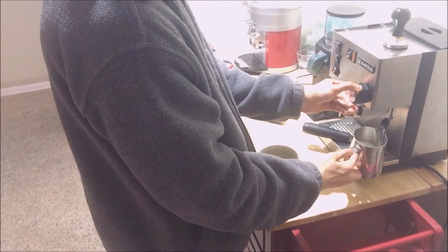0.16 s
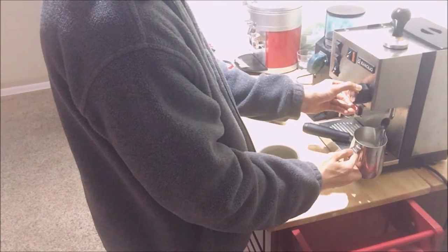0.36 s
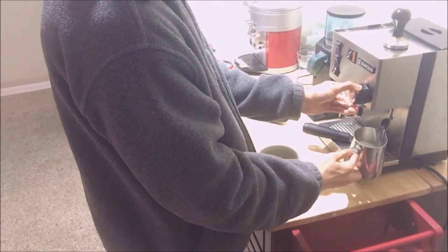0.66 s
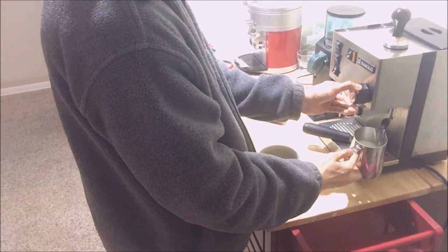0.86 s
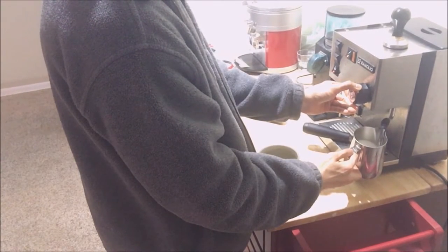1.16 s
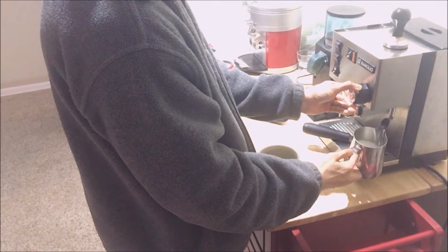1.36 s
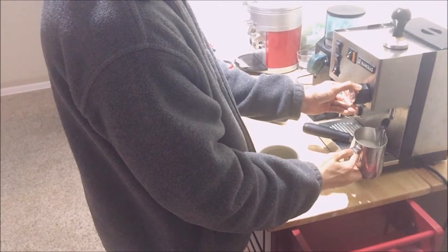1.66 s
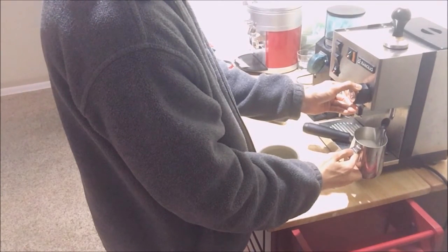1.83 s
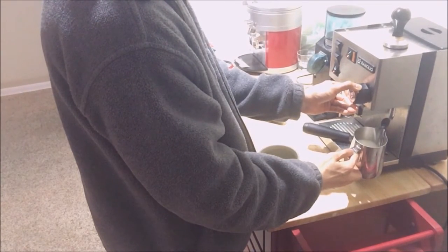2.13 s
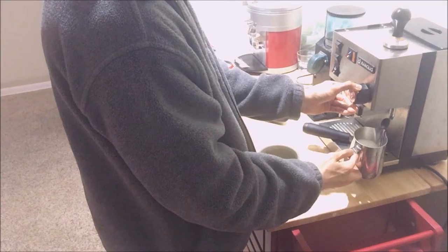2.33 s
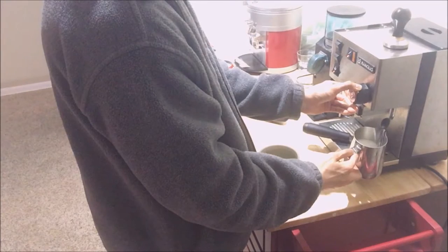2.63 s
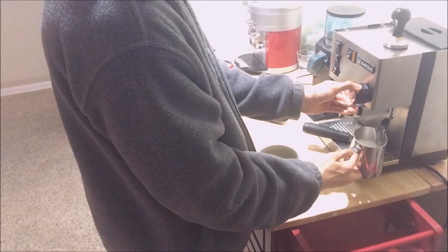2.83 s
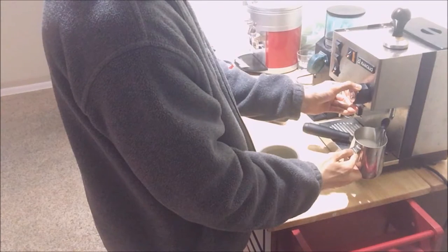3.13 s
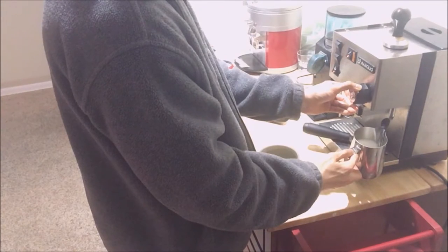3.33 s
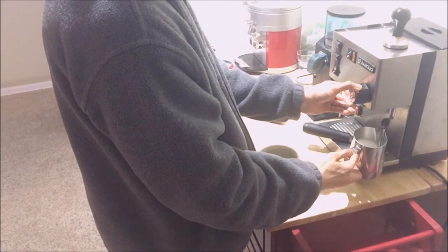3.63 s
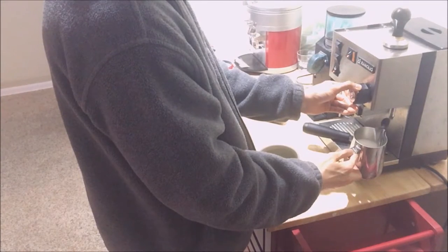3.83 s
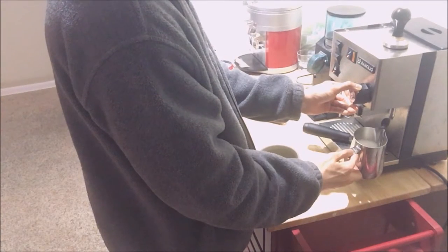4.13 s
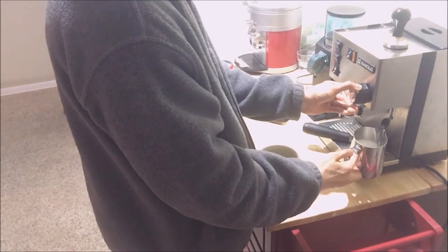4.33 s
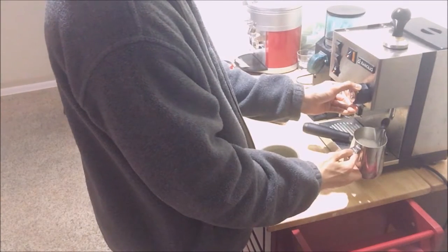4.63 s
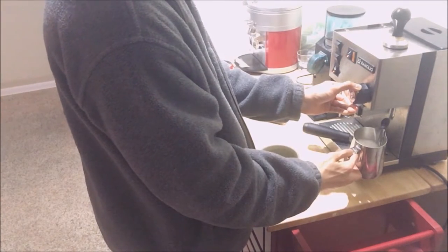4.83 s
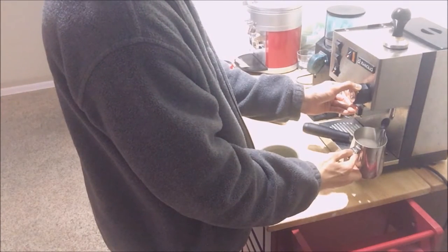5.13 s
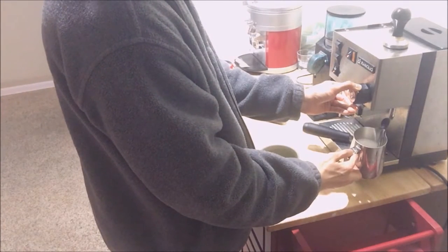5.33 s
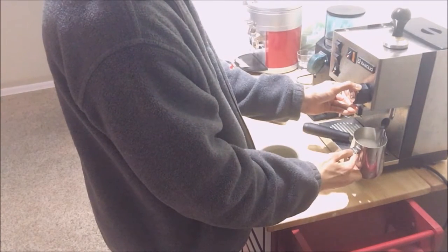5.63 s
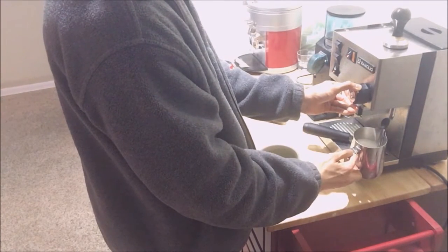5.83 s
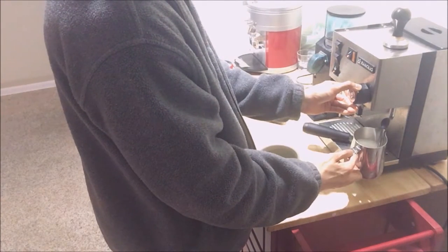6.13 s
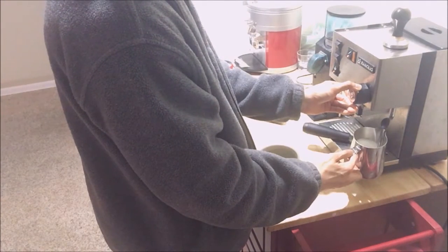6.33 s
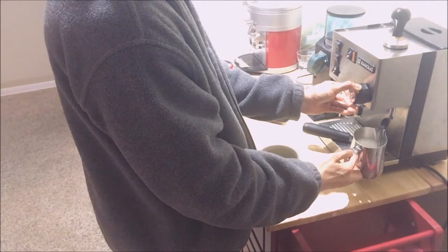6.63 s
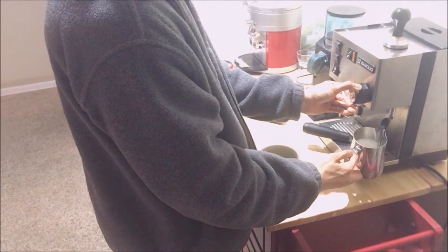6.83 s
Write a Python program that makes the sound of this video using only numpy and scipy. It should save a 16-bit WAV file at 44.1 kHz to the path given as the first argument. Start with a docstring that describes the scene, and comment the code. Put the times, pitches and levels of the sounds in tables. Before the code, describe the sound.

A steam wand is already running in a steel pitcher of milk, close up in a small kitchen with short reflections and faint low rumble. From 0 s, dense bubble crackle rings the metal, with fluttering hiss and a fuzzy, trembling screech around 2.8 kHz. Short chirps sound on notes near 1 and 2.8 kHz. The boil surges around 1 s. At 1.4-1.55 s the tip gulps air in three quick tearing, gurgling spurts, stirring a soft low note that settles. Crackle flares in uneven bursts from 2 to 3.5 s, with a small gulp at 3.2 s. By 3.4 s foam has shifted the resonances and damped the treble. From 4.8 s the boil recedes and gulps come often: spitting spray, shrill or deep gurgles, and brief squeals near 4.9, 5.4 and 6.65 s. They crowd closely from 6.5 to 6.9 s, the steam still running at the end.

```python
"""A steam wand heats milk in a steel pitcher in a small kitchen, over a low room rumble.
From the start bubbles collapse in a dense crackle that rings the pitcher, over the jet's hiss and a screech.
Larger bubbles chirp on single notes; at 1.4 s the tip first gulps air, with a tearing spray and a gurgle.
Foam builds up by about 3.4 s and shifts the resonances; from 4.8 s gulps come often, a few with squeals."""
import sys
import numpy as np
from scipy import signal
from scipy.fft import rfft, irfft
from scipy.io import wavfile
from scipy.ndimage import map_coordinates

SR = 44100
rng = np.random.default_rng(int(sys.argv[2]) if len(sys.argv) > 2 else 0)


def int16_out(signal):
    """Quantize to a 16-bit WAV file."""
    q = np.round(np.clip(np.atleast_2d(signal).T, -1, 1) * 32767)
    wavfile.write(sys.argv[1], SR, q.astype(np.int16))


N = 307377
TIME = np.arange(N) / SR
FOAMED_S = 3.36  # foam has built up by then
CHIRP_S = 0.0115  # bubble ring, about the span between its edge_db points

# the tip draws air: t/s, length/s, spray level before trim/dB, gurgle level before trim/dB, shrillness 0-1
GULPS = [(1.361, 0.022, -41, -46, 0.2), (1.472, 0.027, -39, -42, 0), (1.541, .009, -42.5, -56, .3),
         (3.195, 0.023, -51, -42, 0.57), (4.841, 0.053, -41, -37, .4), (4.899, 0.041, -45.5, -39, .7),
         (5.275, 0.023, -40, -36.5, 0), (5.296, 0.075, -47.5, -37.5, 0.87), (5.392, 0.043, -38.5, -42, 0.9),
         (5.692, .028, -37.5, -55, 0), (5.804, 0.049, -44, -39.5, 0.93), (6.216, .033, -50, -40.5, 0.96),
         (6.276, .034, -37.5, -45, 0.03), (6.347, 0.013, -43.5, -37, 1), (6.517, 0.016, -41, -44.5, .2),
         (6.628, 0.033, -37, -39.5, 0), (6.667, 0.04, -37.5, -42.5, 0.27), (6.72, 0.045, -35, -44, .3),
         (6.761, 0.038, -57, -40, 0.98), (6.871, 0.0092, -37.5, -40.5, 0.1)]
# smooth colour of the boil ahead of the resonances: f/Hz, relative density/dB per Hz
BOIL_COLOUR = [(100, -21), (450, -17), (750, -12), (1000, -3), (1700, -4.5), (2400, 0.5), (3300, -3.5),
               (4700, -3.5), (6000, -14), (7500, -23.5), (10000, -36.5), (16000, -35)]


def gain_of(db):
    """Decibels to amplitude."""
    return 10 ** (np.asarray(db) / 20)


def evened(x):
    """Scales to rms 1."""
    return x / np.sqrt(np.mean(x ** 2) + 1e-20)


def read(points, hz):
    """Interpolates a curve along log frequency."""
    f, value = np.transpose(points)
    return np.interp(np.log(hz + 1), np.log(f + 1), value)


def drift(rate_hz, size=16384):
    """Smooth noise of rms 1 with a Gaussian roll-off at rate_hz."""
    hz = np.fft.rfftfreq(size, N / SR / size)
    spectrum = rfft(rng.standard_normal(size)) * np.exp(-(hz / rate_hz) ** 2)
    return evened(np.interp(TIME, np.linspace(0, N / SR, size), irfft(spectrum)))


def band_rms(x, band_hz):
    """Rms of x inside a band."""
    bandpass = signal.butter(4, band_hz, "band", fs=SR, output="sos")
    return np.std(signal.sosfilt(bandpass, x))


def fuzzy_tone(hz, spread_hz):
    """A resonance driven by turbulence: quadrature carriers under slow noise, rms 1."""
    in_phase = drift(spread_hz) * np.cos(2 * np.pi * hz * TIME)
    quadrature = drift(spread_hz) * np.sin(2 * np.pi * hz * TIME)
    return in_phase + quadrature


def rumble(level_db=-66):
    """The low, steady background of the room: shaped noise."""
    # f/Hz, relative level/dB
    rumble_colour = [(15, -9), (48, -1.5), (65, -2.5), (87, -1), (125, -7.5), (190, -10), (270, -11),
                     (400, -19), (3000, -38)]
    hz = np.fft.rfftfreq(N, 1 / SR)
    spectrum = rfft(rng.standard_normal(N)) * gain_of(read(rumble_colour, hz))
    return gain_of(level_db) * evened(irfft(spectrum, N))


def kitchen(x, size=16384):
    """Dense reflections from the counter and walls: decaying noise taps, the top dying first."""
    # decay: f/Hz, t60/s
    decay = [(200, 0.18), (1000, 0.24), (4000, 0.25), (15000, 0.1)]
    taps = rng.standard_normal(size) * (TIME[:size] > 0.004)
    hz, t, z = signal.stft(taps, SR, nperseg=256)
    z_decayed = z * gain_of(-60 * t / read(decay, hz)[:, None])
    tail = signal.istft(z_decayed, SR, nperseg=256)[1]
    return signal.oaconvolve(x, tail / np.linalg.norm(tail))[:N]


def response(colour, ring, modes, tilt_db_per_oct, size=4096):
    """Minimum-phase taps of unit energy: smooth colour, tilt, and resonance lifts scaled by ring."""
    hz = abs(np.fft.fftfreq(size, 1 / SR))
    lift = 1.0  # power
    for f, width, db in modes:
        lift = lift + (gain_of(db) ** 2 - 1) / (1 + ((hz - f) / (width / 2)) ** 2) ** 1.5
    octaves = np.log2(np.clip(hz, 900, 4500))  # tilt acts between these only
    smooth = np.log(gain_of(read(colour, hz) + tilt_db_per_oct * octaves))
    log_gain = smooth + ring * np.log(lift) / 2
    taps = np.fft.ifft(np.exp(np.conj(signal.hilbert(log_gain)))).real[:size // 2]
    return taps / np.linalg.norm(taps)


def pitcher(x, colour, ring, fresh_tilt_db_per_oct=1.6, swirl=0.093):
    """Rings x through the pitcher; growing, swirling foam shifts the resonances and damps the treble."""
    # modes of pitcher and contents: f fresh/Hz, f foamed/Hz, width/Hz, lift at ring 1/dB
    modes = [(717, 636, 65, 9.5), (945, 959, 73, 16), (1062, 1020, 56, 15.5), (1200, 1380, 91, 7.5),
             (1574, 1556, 88, 9), (2133, 1919, 77, 8), (2580, 2666, 121, 11), (2860, 2825, 97, 13.5),
             (3935, 4100, 168, 10), (4100, 4315, 260, 7.5), (5260, 5220, 153, 9.5), (5590, 5580, 244, 8.5),
             (6620, 6700, 210, 8), (9800, 9550, 215, 8.5)]
    fresh_modes = [(hz, width, db) for hz, _, width, db in modes]
    foamed_modes = [(hz, width, db) for _, hz, width, db in modes]
    fresh = response(colour, ring, fresh_modes, fresh_tilt_db_per_oct)
    foamed = response(colour, ring, foamed_modes, 0)
    foam = np.clip(TIME / FOAMED_S + swirl * drift(13), 0, 1)
    return (1 - foam) * signal.oaconvolve(x, fresh)[:N] + foam * signal.oaconvolve(x, foamed)[:N]


def steel_walls(x, t60_s, share, size=2048):
    """Treble bounces between the pitcher's walls; share is their part of the power."""
    t = TIME[:size]
    bounces = rng.standard_normal(size) * gain_of(-60 * t / t60_s) * (t > 0.0005)
    bounces = signal.sosfilt(signal.butter(2, 4500, "high", fs=SR, output="sos"), bounces)
    bounces /= np.linalg.norm(bounces)
    share = np.clip(share, 0, 1)
    return np.sqrt(1 - share) * x + np.sqrt(share) * signal.oaconvolve(x, bounces)[:N]


def crackle(clicks_per_s, spread_db, share):
    """Bubble clicks of uneven size in a wash of countless tiny ones; share is the clicks' power."""
    sizes = gain_of(spread_db * np.minimum(rng.exponential(1, N), 4)) * rng.choice([-1, 1], N)
    clicks = evened(sizes * (rng.random(N) < clicks_per_s / SR))
    share = np.clip(share, 0, 1)
    return np.sqrt(share) * clicks + np.sqrt(1 - share) * rng.standard_normal(N)


def patchy(x, depth_db, patch_hz, patch_s):
    """Each part of the spectrum swells by itself, as when bubbles of like size come in swarms."""
    hz, t, z = signal.stft(x, SR, nperseg=256)
    place = np.meshgrid(hz / patch_hz, t / patch_s, indexing="ij")
    swarms = evened(map_coordinates(rng.standard_normal(z.shape), place, order=1, mode="wrap"))
    return evened(signal.istft(z * gain_of(depth_db * swarms), SR, nperseg=256)[1][:N])


def steam_db():
    """Boil, hiss and screech levels per sample, as the tip sits deeper or shallower."""
    # before trim: t/s, boil/dB, hiss/dB, screech/dB
    course = [(0.0, -54, -52.5, -46), (0.62, -57, -55.5, -54), (1.36, -55.5, -51, -45.5),
              (1.51, -53, -53.5, -47.5), (1.82, -55, -55.5, -50.5), (2.1, -53.5, -59, -46.5),
              (2.29, -56.5, -57, -49), (2.7, -58.5, -56.5, -55.5), (3.26, -55.5, -55, -51.5),
              (3.65, -58, -57, -52), (3.98, -54.5, -53.5, -48), (4.23, -61, -57, -54.5),
              (4.87, -58, -53, -49.5), (5.1, -63, -55, -56.5), (5.41, -64, -56.5, -49),
              (5.67, -60.5, -55, -60), (6.04, -64.5, -56, -58), (6.97, -60, -58, -54)]
    s, *levels_db = np.transpose(course)
    return [np.interp(TIME, s, db) for db in levels_db]


def flare_db():
    """Bell-shaped lifts of boil and hiss, as the steam pocket flares up or briefly chokes."""
    # t middle/s, length/s, boil lift/dB, hiss lift/dB
    surges = [(0.768, 0.051, -7, -0.5), (0.948, 0.15, 7.5, -0.5), (1.075, 0.092, 4.5, 6),
              (1.598, 0.067, 5, -2.5), (2.122, .11, 8.5, 2.5), (2.35, 0.016, 7.5, 1), (2.516, 0.13, 8, 5.5),
              (2.745, .05, -5.5, 1.5), (2.934, 0.051, 6.5, -2), (3.089, 0.016, 12, -1),
              (3.292, 0.17, 6.5, 0.5), (3.44, 0.013, 6, 0), (3.492, 0.024, 9, -1), (4.03, .07, 2.5, 4),
              (4.296, 0.064, -8, -3.5), (4.485, 0.091, 5, 5), (6.46, 0.052, -0.5, -4)]
    s, length_s, *lifts_db = np.transpose(surges)
    bells = np.exp(-(2 * (TIME - s[:, None]) / length_s[:, None]) ** 2)
    return np.array(lifts_db) @ bells


def heave(rest_db=-78, stirred_db=-66.0, start_s=1.36, settle_s=0.57):
    """The milk's soft low note; the first gulp stirs it up and it settles again."""
    age = TIME - start_s
    stirred = gain_of(stirred_db) * (age > 0) * np.exp(-abs(age) / settle_s)
    return (gain_of(rest_db) + stirred) * fuzzy_tone(hz=277.4, spread_hz=51)


def jet(trim_db=-0.78, flutter_db=1.3):
    """The fluttering hiss of the nozzle: patchy noise off the steel walls, rung by the pitcher."""
    # f/Hz, relative density/dB per Hz
    hiss_colour = [(300, -20), (780, -15.5), (1000, -6), (2000, -8.5), (3500, -7), (5500, 2.5), (7000, -1),
                   (8200, -7.5), (10300, -12.5), (11800, -12.5), (16000, -22)]
    drive = patchy(rng.standard_normal(N), depth_db=2.5, patch_hz=2010, patch_s=0.035)
    sound = pitcher(steel_walls(drive, t60_s=0.03, share=0.29), hiss_colour, ring=1.0)
    _, hiss_db, _ = steam_db()
    _, lift_db = flare_db()
    level_db = hiss_db + lift_db + trim_db + flutter_db * drift(21.3)
    return gain_of(level_db) * sound / band_rms(sound, (5000, 7500))


def screech(churn, trim_db=-4, churn_db=3):
    """The steam pocket at the tip drives a cluster of close modes into a fuzzy whistle."""
    # f/Hz, spread/Hz, relative level/dB
    cluster = [(2620, 46, -6), (2835, 44, 6), (2806, 60, -1)]
    whistle = sum(gain_of(db) * fuzzy_tone(hz, spread) for hz, spread, db in cluster)
    _, _, screech_db = steam_db()
    return gain_of(screech_db + trim_db + churn_db * churn) * evened(whistle)


def lesser_bubbles(spread_db=2.0, detune_hz=28):
    """Rows (t/s, dB, Hz, length/s) of chance bubbles on two notes; levels follow the boil's slow course."""
    # f/Hz, rate/(1/s), level before trim over the boil course at start/dB, once foamed/dB, at end/dB
    notes = [(1014, 11.9, -1, 9.6, 3), (2810, 8, 13, 9.6, 7)]
    boil_db, _, _ = steam_db()
    rows = []
    for hz, per_s, *over_db in notes:
        chance = rng.random(N)
        size, pitch = rng.standard_normal((2, N))
        db = boil_db + np.interp(TIME, [0, FOAMED_S, N / SR], over_db) + spread_db * size
        for i in np.flatnonzero(chance < per_s / SR):
            rows.append((TIME[i], db[i], hz + detune_hz * pitch[i], CHIRP_S))
    return rows


def ring_bubbles(rows, trim_db=-2, sag_hz=22, waver_hz=45, rough=0.14, edge_db=3.5, lean=0.067,
                 snap_db=-5, snap_s=0.0029):
    """A bubble tears off with a snap and rings as a short rough tone that sags in pitch."""
    waver, grit = drift(133), drift(170)
    noise, phases = rng.standard_normal(N), rng.random(N)
    tones, snaps = np.zeros((2, N))
    for (s, db, hz, length_s), phase in zip(rows, phases):
        near = slice(*np.searchsorted(TIME, [s - 2 * length_s, s + 2 * length_s]))
        age = 2 * (TIME[near] - s) / length_s  # in half lengths from the peak
        turns = np.cumsum(hz - sag_hz * age + waver_hz * waver[near]) / SR + phase
        # dies more slowly than it rose
        swell = gain_of(db + trim_db - edge_db * (age - lean * abs(age)) ** 2)
        tones[near] += swell * (1 + rough * grit[near]) * np.sqrt(2) * np.sin(2 * np.pi * turns)
        torn_s = TIME[near] - (s - length_s / 2)
        snaps[near] += gain_of(db + snap_db) * (torn_s > 0) * np.exp(-abs(torn_s) / snap_s)
    return tones + pitcher(snaps * noise, BOIL_COLOUR, ring=1)


def chirps():
    """Bubbles ring on one note each; air squealing through the tip rings all modes of its pocket."""
    # largest bubbles: t peak/s, level before trim/dB, f/Hz
    largest = [(0.408, -36.5, 2860), (0.973, -36, 2810), (0.982, -38, 1019), (1.073, -36, 2800),
               (1.41, -35.5, 2800), (1.586, -34.5, 1054), (1.922, -37.5, 1037), (1.969, -32.5, 2820),
               (2.042, -35.5, 1006), (2.342, -36, 1023), (2.42, -40, 1025), (2.661, -38, 1029),
               (3.038, -40, 979), (3.1, -37.5, 984.5), (3.493, -38, 2810), (3.647, -38, 1007),
               (4.852, -33, 2790), (4.928, -32, 2650), (5.297, -35.5, 1000), (5.39, -33, 2780),
               (5.704, -30, 1008), (5.722, -37, 951), (5.829, -35.5, 2700), (6.232, -36.5, 2650),
               (6.29, -39.5, 1000), (6.73, -37.5, 978), (6.791, -35.5, 2735)]
    # squeals: t peak/s, length/s, level before trim/dB, pitch factor
    squeals = [(4.864, .024, -33.5, 1.005), (5.391, 0.017, -35, .99), (5.419, .015, -31.5, 1.01),
               (6.645, .017, -37.5, 0.9)]
    # air pocket modes: f before pitch factor/Hz, relative level/dB
    pocket = [(1030, -0.5), (1480, -1.5), (1920, -2.5)]
    rows = [(s, db, hz, CHIRP_S) for s, db, hz in largest]
    for s, length_s, db, factor in squeals:
        for hz, mode_db in pocket:
            rows.append((s, db + mode_db, hz * factor, length_s))
    return ring_bubbles(rows + lesser_bubbles())


def gulp_envelope(gains, rise_s, fall_s, foam_db, foam_s):
    """Each gulp opens fast, holds and closes; foam fizzes as the tip nears the surface and sinks again."""
    power = np.zeros(N)
    for (s, length_s, *_), gain in zip(GULPS, gains):
        near = abs(TIME - s) < 0.4
        age = TIME[near] - s
        before, after = np.maximum(-age, 0), np.maximum(age - length_s, 0)
        opening = np.clip(age / (rise_s * (length_s / 0.036)), 0, 1)  # rise_s holds for a 36 ms gulp
        foamed = min(s / FOAMED_S, 1)  # more foam, more fizz
        foam = gain_of(foam_db) * foamed * np.exp(-(2 * before + after) / foam_s)
        power[near] += gain ** 2 * ((opening * np.exp(-after / fall_s)) ** 2 + foam ** 2)
    return np.sqrt(power)


def spray(gains, trim_db=1.0, sputter_db=2.0):
    """The bare jet tears the surface into droplets: sputtering crackle off the steel walls."""
    # f/Hz, relative density/dB per Hz
    spray_colour = [(200, -7.5), (450, -15), (900, -8.5), (3000, -18.5), (5500, -5), (7000, -5),
                    (9000, -6.5), (10800, 1), (13000, 1.5), (16000, -0.5)]
    droplets = crackle(clicks_per_s=2500, spread_db=5, share=0.56)
    drive = evened(droplets * gain_of(sputter_db * drift(130)))
    envelope = gulp_envelope(gains, rise_s=0.0013, fall_s=0.0067, foam_db=-17.0, foam_s=0.079)
    drive *= gain_of(trim_db) * envelope
    return pitcher(steel_walls(drive, t60_s=0.039, share=0.56), spray_colour, ring=1.0)


def gurgle(gains, colour, trim_db=-1.0):
    """Swallowed air breaks up into separate pops and swarms of ringing bubbles."""
    pops = crackle(clicks_per_s=800, spread_db=1.5, share=0.65)
    drive = patchy(pops, depth_db=3, patch_hz=696, patch_s=0.014)
    envelope = gulp_envelope(gains, rise_s=0.0035, fall_s=0.012, foam_db=-25, foam_s=0.033)
    drive *= gain_of(trim_db) * envelope
    return pitcher(drive, colour, ring=1.0)


def gulps():
    """Each gulp of air sprays above the surface and gurgles, deep or shrill, below it."""
    # both: f/Hz, relative density/dB per Hz
    deep_colour = [(100, -16), (420, -19.5), (550, -3.5), (780, -16.5), (1000, 1), (1500, 0.5),
                   (2000, -3.5), (3200, -10.5), (4500, -9), (6500, -14), (9000, -45), (16000, -50)]
    shrill_colour = [(100, -36), (450, -28), (1000, -13), (2000, -4), (2600, 0.5), (3700, -2), (4400, -2),
                     (6500, -9), (9000, -16), (16000, -36)]
    _, _, spray_db, gurgle_db, shrill = np.transpose(GULPS)
    shrill = np.clip(shrill, 0, 1)
    deep = gurgle(gain_of(gurgle_db) * np.sqrt(1 - shrill), deep_colour)
    high = gurgle(gain_of(gurgle_db) * np.sqrt(shrill), shrill_colour)
    return spray(gain_of(spray_db)) + deep + high


def boil(churn, trim_db=0.75, churn_db=1.27):
    """Steam bubbles collapse in uneven surges; their crackle rattles the pitcher."""
    clicks = crackle(clicks_per_s=2500, spread_db=2.5, share=0.31)
    drive = patchy(clicks, depth_db=3.0, patch_hz=820, patch_s=0.02)
    # the milk swallows the top
    muffled = signal.sosfilt(signal.butter(2, 9000, fs=SR, output="sos"), drive)
    sound = pitcher(muffled * gain_of(churn_db * churn), BOIL_COLOUR, ring=1.115)
    boil_db, _, _ = steam_db()
    lift_db, _ = flare_db()
    return gain_of(boil_db + lift_db + trim_db) * sound / band_rms(sound, (1200, 2450))


def scene(room_db=-12):
    """All that the wand does, in the kitchen."""
    churn = drift(45.0)  # the steam pocket trembles unevenly
    wand = boil(churn) + screech(churn) + heave() + jet() + gulps() + chirps()
    return (wand + gain_of(room_db) * kitchen(wand) + rumble())[None]


def record(dry, edge_hz=15850):
    """Linear-phase low-pass that limits the band."""
    lowpass = signal.firwin(511, edge_hz, window=("kaiser", 9), fs=SR)
    return signal.oaconvolve(dry, lowpass[None], "same")


dry = scene()
out = record(dry)
int16_out(out)
```